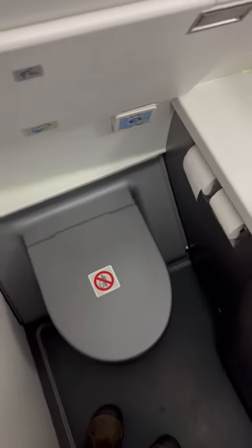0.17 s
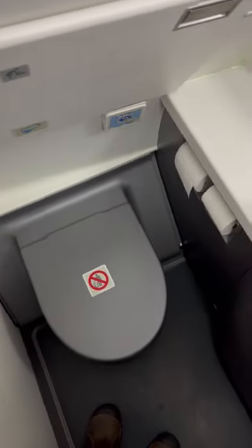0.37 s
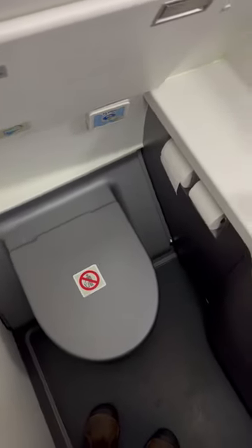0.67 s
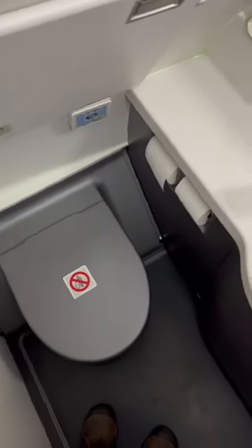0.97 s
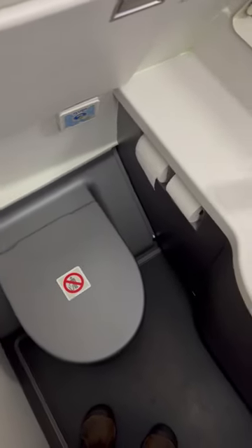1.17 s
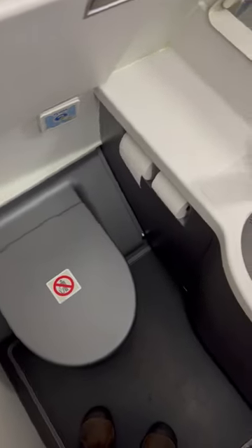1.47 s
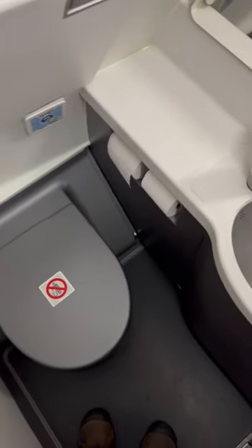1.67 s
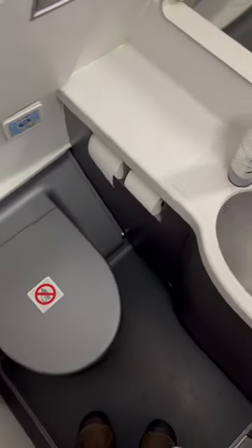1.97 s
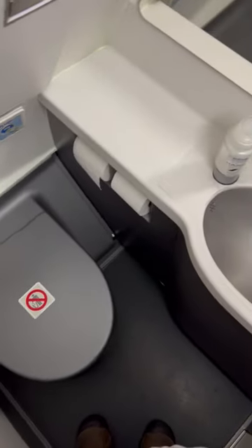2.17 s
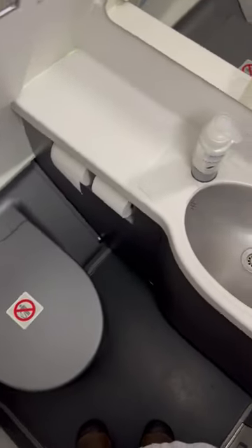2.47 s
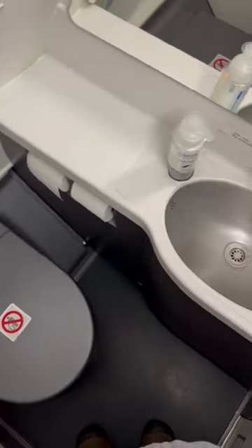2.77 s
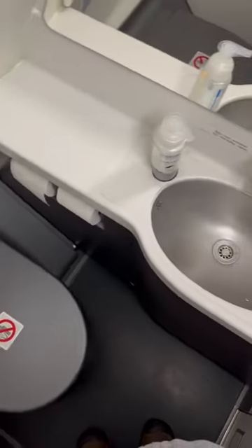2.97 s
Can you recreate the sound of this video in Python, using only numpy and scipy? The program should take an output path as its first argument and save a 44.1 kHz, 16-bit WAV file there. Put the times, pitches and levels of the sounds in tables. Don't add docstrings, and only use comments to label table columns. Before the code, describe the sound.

A low, steady engine hum and rumbling air roar run continuously in a tiny airplane restroom, with very faint vent hiss, picked up by a handheld phone in stereo turning from seat to sink.

```python
import sys
import numpy as np
from scipy import signal
from scipy.fft import rfft, irfft, next_fast_len
from scipy.io import wavfile
from scipy.ndimage import uniform_filter1d, map_coordinates

SR = 44100
rng = np.random.default_rng(int(sys.argv[2]) if len(sys.argv) > 2 else 0)


def volts_from_db(level):
    exponent = np.asarray(level, float) / 20
    return 10 ** exponent


def waveform_to_disk(signal):
    frames = np.transpose(np.atleast_2d(signal))
    scaled = np.clip(frames, -1, 1) * 32767
    samples = np.round(scaled).astype(np.int16)
    wavfile.write(sys.argv[1], SR, samples)


N = 137151
TIME = np.arange(N) / SR


def unit(x):
    return x / np.sqrt(np.mean(np.abs(x) ** 2) + 1e-20)


def along(points, hz):
    f, *columns = np.transpose(points)
    return np.array([np.interp(np.log(hz + 1), np.log(f + 1), c) for c in columns])


def wobble(rate):
    return map_coordinates(rng.standard_normal(400), [TIME * rate])


def patchy(patchy_db):
    z = signal.stft(rng.standard_normal(N), nperseg=512)[2]
    field = uniform_filter1d(rng.standard_normal(z.shape), size=6, axis=0)
    field = uniform_filter1d(field, size=14, axis=1)
    return signal.istft(z * volts_from_db(patchy_db * unit(field)), nperseg=512)[1][:N]


def coloured(x, spectrum, lift=lambda hz: 0):
    m = next_fast_len(N + 8192)
    hz = np.fft.rfftfreq(m, 1 / SR)
    gain = volts_from_db(along(spectrum, hz)[0] + lift(hz))
    return unit(irfft(rfft(x, m) * gain, m)[:N])


# t/s, f/Hz, level/dB
FAN_WHINE = [
    (0, 5820, -69),
    (.5, 5795, -68),
    (.8, 5795, -70),
    (.92, 5825, -70),
    (1.35, 5835, -69),
    (1.65, 5800, -75),
    (2, 5815, -68),
    (2.6, 5810, -76),
    (2.9, 5830, -68),
    (3.11, 5805, -71),
]
# f/Hz, level/dB
ELECTRIC_WHINES = [(9522, -85), (9678, -86)]


def whine():
    t, hz, db = np.transpose(FAN_WHINE)
    fan_hz = np.interp(TIME, t, hz) + 6 * wobble(25)
    fan_level = volts_from_db(np.interp(TIME, t, db) + 0.5 + 2.5 * wobble(17))
    tones = fan_level * np.sin(2 * np.pi * np.cumsum(fan_hz) / SR)
    for hz, db in ELECTRIC_WHINES:
        tones = tones + volts_from_db(db + 1.5 * wobble(5)) * np.sin(2 * np.pi * hz * TIME)
    return np.sqrt(2) * tones


# f/Hz, level/dB (per Hz)
HISS_MIDDLE = [(3200, -120), (4300, 3.5), (5050, -2.5), (6400, 1), (8300, -3), (10300, -15), (11750, -17.5),
               (12100, -120)]
# f/Hz, level/dB (per Hz)
HISS_LOW_WIDTH = [(3200, -120), (4100, -2), (5100, 0), (5650, -11.5), (6000, -25), (6200, -120)]
# f/Hz, level/dB (per Hz)
HISS_HIGH_WIDTH = [(7450, -120), (7560, -1), (8800, 3), (10100, -5), (11500, 0), (15000, -11.5),
                   (15700, -16.5), (15800, -120)]


def vent():
    air, stray = patchy(0.8), patchy(0.5)
    late_air = signal.hilbert(air).imag

    def lagging(share):
        return share * late_air + np.sqrt(1 - share ** 2) * stray

    mid = volts_from_db(-55) * coloured(air, HISS_MIDDLE) + whine()
    low_width = volts_from_db(-62) * coloured(lagging(.5), HISS_LOW_WIDTH)
    high_width = volts_from_db(-66) * coloured(lagging(.85), HISS_HIGH_WIDTH)
    side = low_width + high_width
    return np.array([mid + side, mid - side])


# f/Hz, likeness 0-1, left leads/rad, left over right level/dB
FACING_SEAT = [(200, .996, 0, -.4), (450, .95, .1, -2.5), (750, .4, .9, -1), (950, .55, .9, 2),
               (1700, .93, 0, .3), (2300, .88, .1, .5), (2900, .62, .1, 2), (4100, .62, -.7, 1)]
# f/Hz, likeness 0-1, left leads/rad, left over right level/dB
SLIPPED = [(150, .985, -.15, -.5), (400, .78, -1.1, -4), (530, .9, -2.95, -.8), (760, .99, -3.2, 0),
           (1350, .35, -4.3, -2), (1800, .55, -5.8, -.5), (3000, .15, -5.8, .5), (4100, .65, -6.7, 0)]
# f/Hz, likeness 0-1, left leads/rad, left over right level/dB
FACING_SINK = [(200, .996, 0, -.3), (370, .95, -.1, -2), (560, .85, -.2, -3), (750, .05, 0, -3),
               (1050, .3, .2, -2.5), (1700, .77, -.2, -2), (3200, .2, -1, -.3), (4100, .67, -.5, 1)]
# f/Hz, level/dB
SEAT_GAIN = [(400, 0), (900, 1), (1800, -1), (3000, 1)]
# f/Hz, level/dB
SLIP_GAIN = [(400, 0), (700, 3), (1000, 4), (1700, .5), (3000, -0.5)]
# f/Hz, level/dB
SINK_GAIN = [(400, -1), (900, .5), (1800, -0.5), (3000, 0.5)]


def ports(near, other):
    hz, t, (a, b) = signal.stft(np.array([near, other]), SR, nperseg=1024)

    def ramp(middle_s, width_s):
        return np.clip((t - middle_s) / width_s + .5, 0, 1)

    def hearing(port_table, gain_table):
        return np.vstack([along(port_table, hz), along(gain_table, hz)])[..., None]

    def heard(alike, lead, balance_db, gain_db):
        angle = np.arccos(np.clip(alike, 0, 1)) / 2
        left = volts_from_db(gain_db + balance_db / 2) * (np.cos(angle) * a + np.sin(angle) * b)
        right = volts_from_db(gain_db - balance_db / 2) * (np.cos(angle) * a - np.sin(angle) * b)
        return np.array([left * np.exp(1j * lead), right])

    slip = ramp(1.81, .06) - ramp(2.4, .06)
    turned = ramp(1.72, 0.71)
    seat, sink = hearing(FACING_SEAT, SEAT_GAIN), hearing(FACING_SINK, SINK_GAIN)
    steady = heard(*(seat * (1 - turned) + sink * turned))
    alike, *rest = hearing(SLIPPED, SLIP_GAIN)
    early_slip = (t < 2.1) & (hz[:, None] > 450)
    late = heard(alike * np.where(early_slip, 0.88, 1), *rest)
    mix = steady * (1 - slip) ** 0.76 + late * slip ** 1.1
    return signal.istft(mix, SR, nperseg=1024)[1][:, :N]


# f/Hz, width/Hz, level/dB (lift)
CUBICLE = [(173, 12, 0.5), (230, 34, 2), (365, 45, 1), (454, 50, 4.5), (617, 60, 3), (711, 67, 1.5),
           (960, 120, 2.5), (1364, 36, 3.5), (1560, 58, 3), (1645, 42, 4.5), (2760, 45, 3.5),
           (2800, 63, -2.5), (3160, 70, 0), (4032, 27, 0.5)]


def cubicle(hz):
    return sum(db / (1 + (2 * (hz - centre) / width) ** 2) for centre, width, db in CUBICLE)


# f/Hz, level/dB (per Hz)
RUMBLE = [(10, -60), (28, -17.5), (50, -7.5), (95, 2), (140, -7.5), (155, -23.5), (200, -31.5), (300, -120)]
# f/Hz, level/dB (per Hz)
ROAR = [(70, -120), (150, -0.5), (451, -5.5), (520, -9), (2600, -19.5), (3700, -25), (4500, -36.5),
        (5500, -120)]


def hull():
    swell = volts_from_db(0.2 * wobble(3.1) + 0.11 * wobble(7.2))

    def airflow():
        rumble = volts_from_db(-21) * coloured(patchy(.5), RUMBLE)
        roar = volts_from_db(-29) * swell * coloured(patchy(0.18), ROAR, cubicle)
        return rumble + roar

    return ports(airflow(), airflow())


# t/s, level/dB
SHAFT_LEVEL = [(0, -15.5), (.35, -19.5), (.65, -14), (.8, -17), (.9, -12), (1.4, -16.5), (1.95, -14.5),
               (2.02, -16.5), (2.1, -13), (2.441, -14), (2.52, -13.5), (3.11, -13.5)]


def shaft():
    shaft_hz, trough_s = 77.255, .0008
    t, db = np.transpose(SHAFT_LEVEL)
    level = np.sqrt(2) * volts_from_db(np.interp(TIME, t, db))
    return -level * np.cos(2 * np.pi * shaft_hz * (TIME - trough_s))


def scene():
    left_right_db = [[-.1], [.1]]
    return vent() + hull() + shaft() * volts_from_db(left_right_db)


def low_pass(x):
    return signal.sosfilt(signal.butter(12, 15750, fs=SR, output="sos"), x)


def record(dry):
    return low_pass(dry)


dry = scene()
out = record(dry)
waveform_to_disk(out)
```